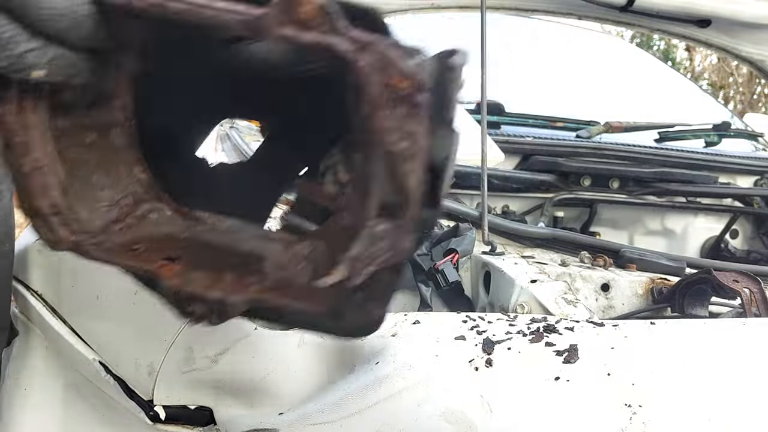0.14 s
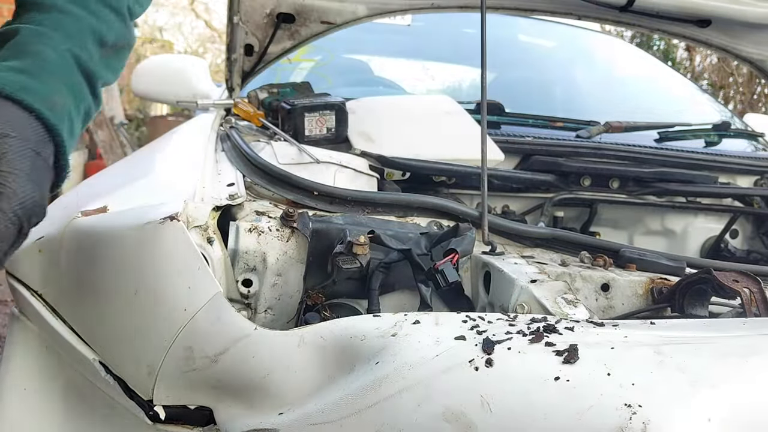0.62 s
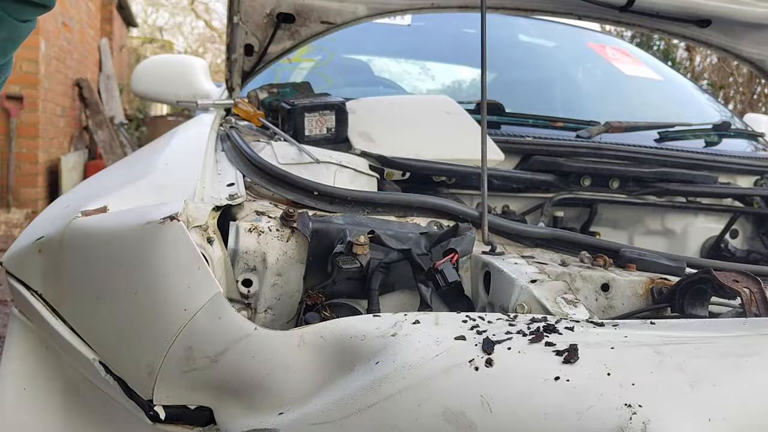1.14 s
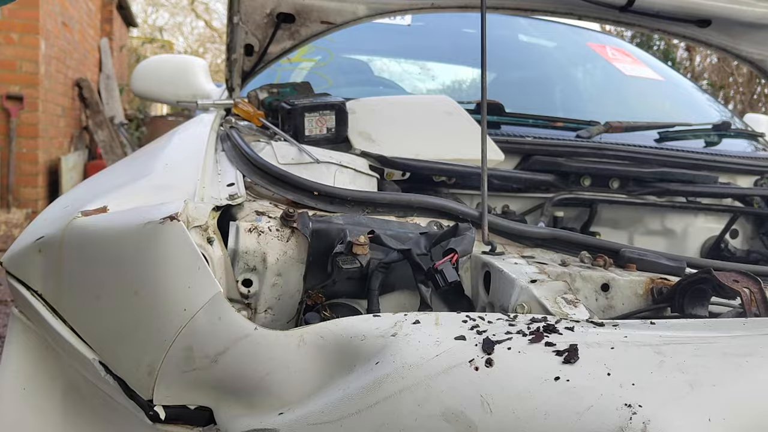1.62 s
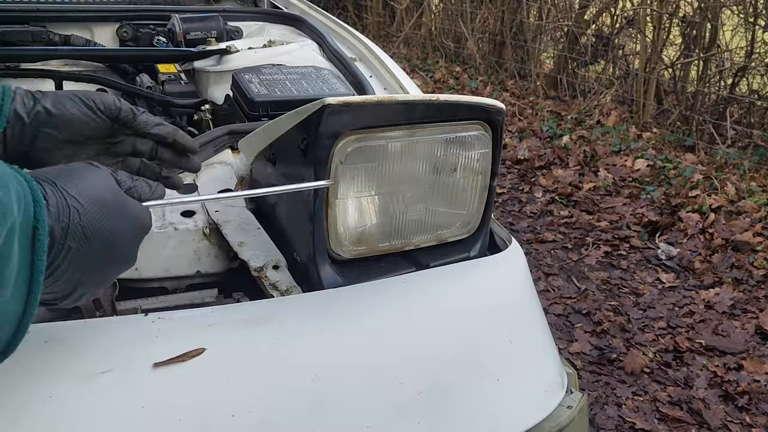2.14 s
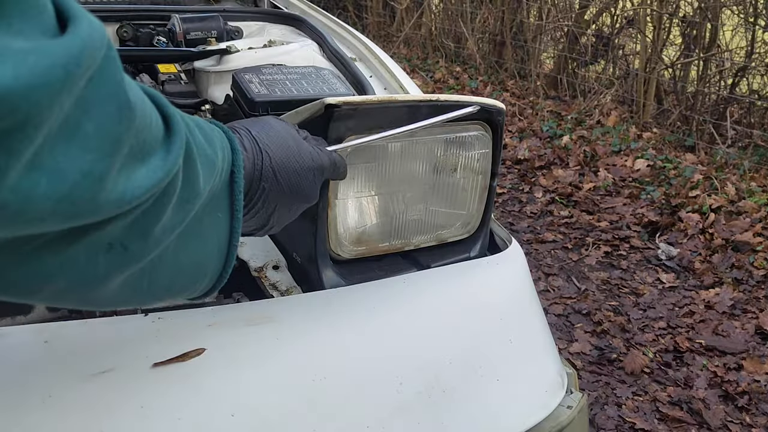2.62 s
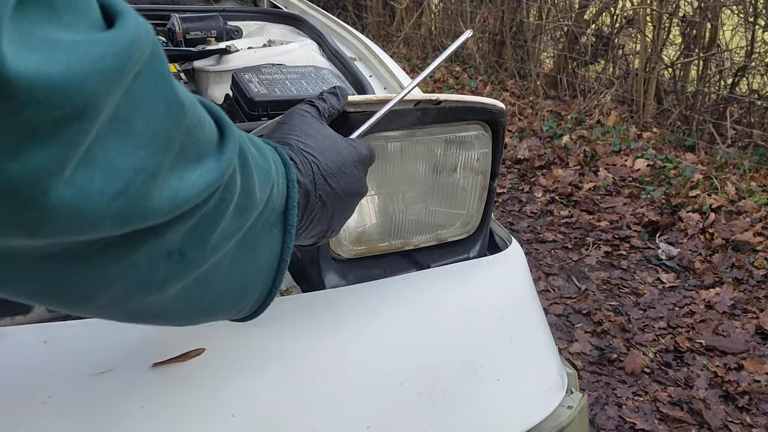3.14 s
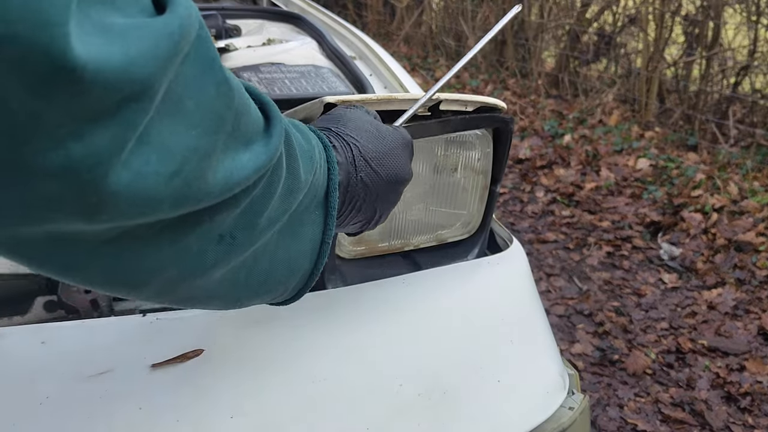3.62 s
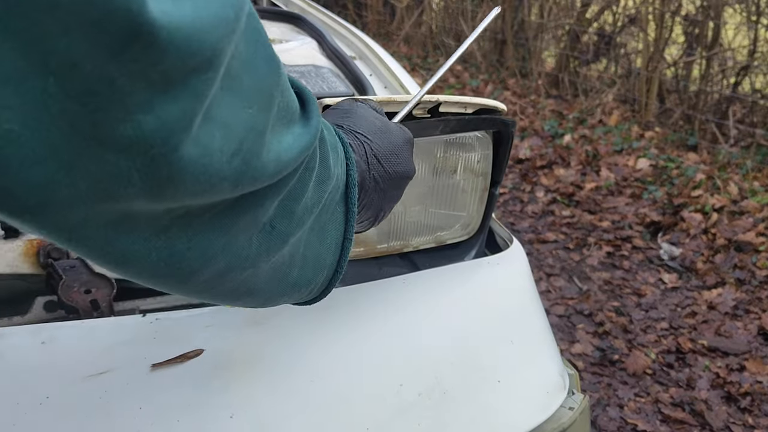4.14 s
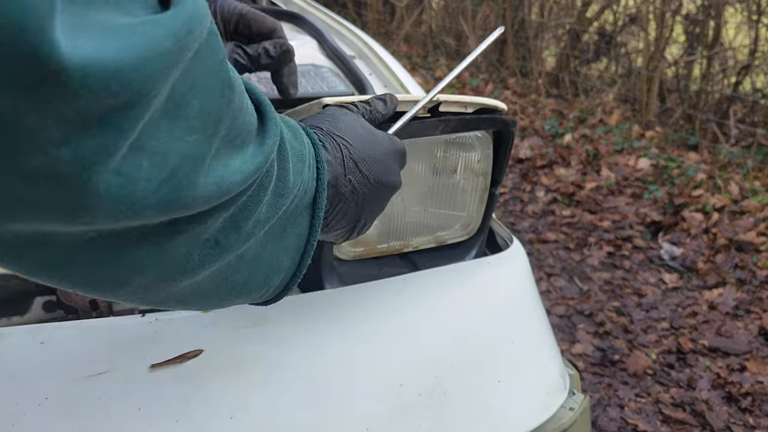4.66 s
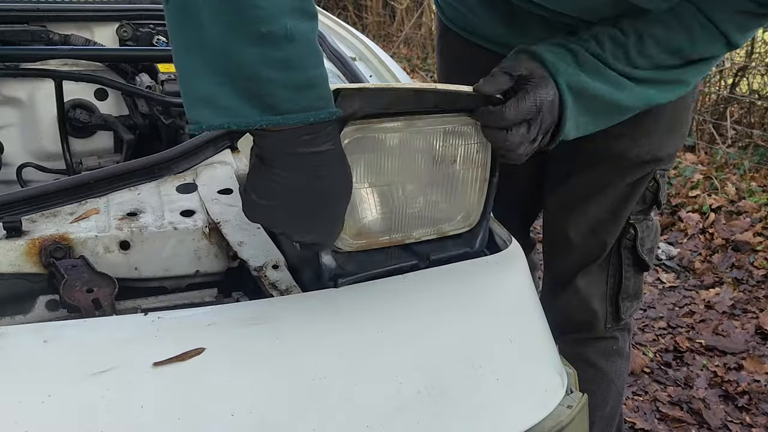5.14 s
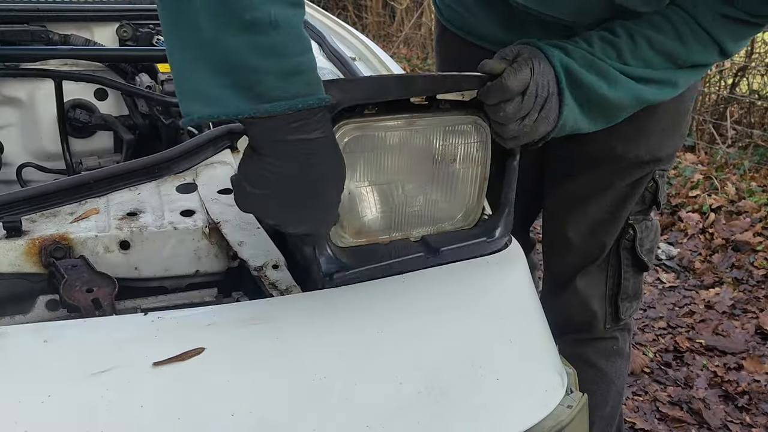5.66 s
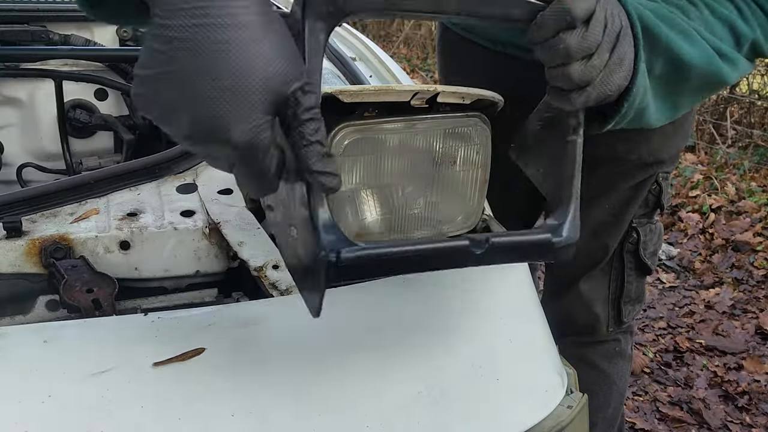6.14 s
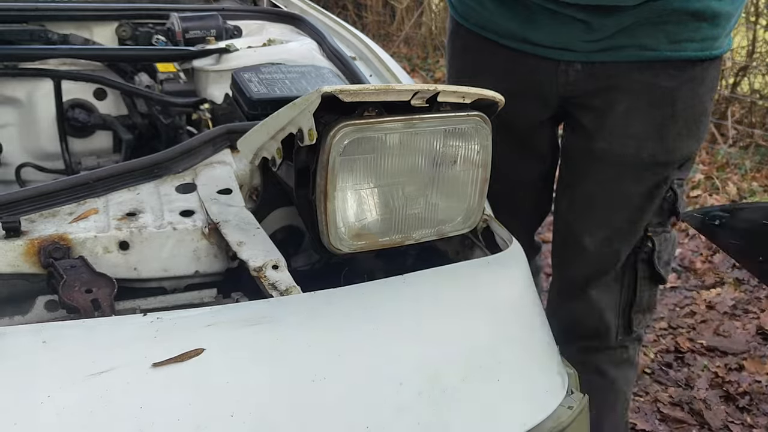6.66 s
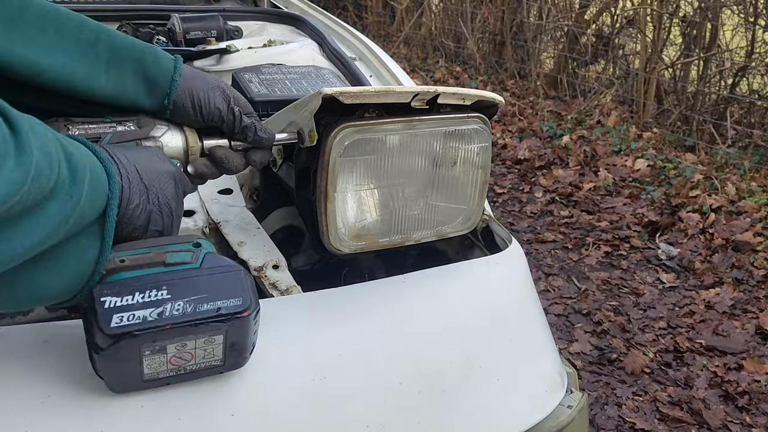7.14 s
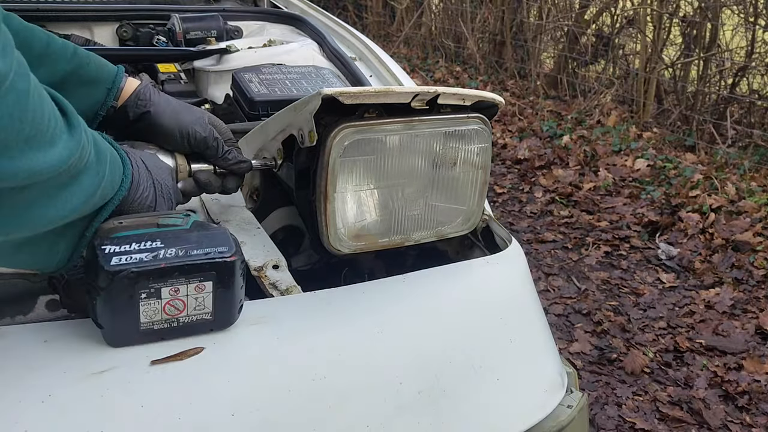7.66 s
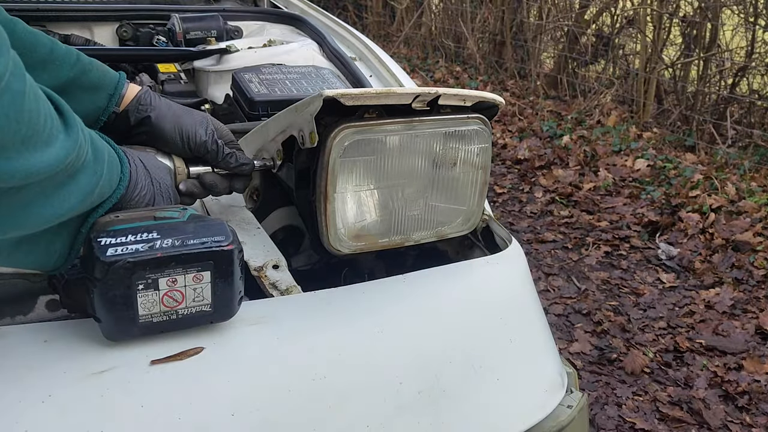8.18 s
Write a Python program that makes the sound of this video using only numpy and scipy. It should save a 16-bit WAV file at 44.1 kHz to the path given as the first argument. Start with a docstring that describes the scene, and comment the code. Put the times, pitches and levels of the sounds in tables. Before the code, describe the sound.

Outdoors by a car, a metal housing drops with a clank, plastic trim is pried and snapped loose, then an impact driver hammers and spins briefly.

```python
"""Outdoors, close to a car's front end: a rusty lamp housing is dropped, a screwdriver pries at a plastic lamp bezel,
the bezel is pulled off, an impact driver hammers a bolt and later spins freely.
Blows are noise cracks with decaying modes, rubbing is stick-slip noise through resonances, the driver is
coloured grit with mesh tones. Birds whistle in gliding sines over filtered-noise traffic and leaves.
The background level and the direction of near sounds step from one stretch of time to the next."""
import sys
import numpy as np
from scipy import signal
from scipy.fft import rfft, irfft, next_fast_len
from scipy.io import wavfile
from scipy.ndimage import uniform_filter1d, map_coordinates

SR = 44100
rng = np.random.default_rng(int(sys.argv[2]) if len(sys.argv) > 2 else 0)


def boost_factor(decibels):
    """Convert a level in decibels to a linear amplitude factor."""
    exponent = np.asarray(decibels, float) / 20
    return 10 ** exponent


def put_to_file(sound):
    """Save the sound as 16-bit audio at rate SR, in the file named by the first command-line argument."""
    columns = np.atleast_2d(sound).T  # one column per channel
    safe = np.clip(columns, -1, 1)
    whole_steps = np.round(safe * 32767)
    wavfile.write(sys.argv[1], SR, whole_steps.astype(np.int16))


N = 365575
TIME = np.arange(N) / SR
HZ = np.maximum(np.fft.rfftfreq(next_fast_len(N), 1 / SR), 1)
FADE_DB = 30  # the fall that rise, fall, unloading and run-down times span
CRACK_T60_S = 0.016  # of the main part of a crack

# Modes of the car panel. Each row: frequency in Hz, level in dB, t60 in seconds.
PANEL_MODES = [(103, -20, 0.029), (146, -8.5, 0.12), (166.3, -6, 0.12), (210, 2.5, 0.078), (253.7, -5, 0.1),
               (280, 3, 0.052), (341.6, -6.5, .1), (364, -6, 0.075)]
# Modes of the plastic bezel. Each row: frequency in Hz, level in dB, t60 in seconds.
BEZEL_MODES = [(458, 8.5, 0.057), (501, 5.5, 0.091), (575, 3.5, 0.062), (647, 2, 0.09), (705, 3, .06),
               (929, 2, 0.066), (968, 6.5, 0.012), (1260, -0.5, 0.062), (1484, -4.5, 0.037),
               (1800, -9.5, 0.029)]
# Modes of the bolt. Each row: frequency in Hz, level in dB, t60 in seconds.
BOLT_MODES = [(709, -7.5, 0.17), (927, -2, 0.26), (1644, -5.5, 0.16), (2610, -0.5, 0.07),
              (2775, -5.5, 0.058), (3033, -4, 0.06), (3210, 0, 0.061), (3285, -13.5, 0.24),
              (3335, -13.5, 0.23), (3920, -5.5, 0.034), (4587, -7, 0.065), (4850, -6.5, 0.046)]
# Bright snaps of catches and bit that also jolt the panel.
# Each row: start in seconds, crack level in dB, thud level in dB, crack frequency in Hz, thud focus in Hz.
SNAPS = [(4.046, -40, -39.5, 3870, 372), (5.414, -24.5, -31.5, 5640, 215), (5.4224, -13, -26, 4800, 290),
         (5.455, -26, -45, 4630, 256), (5.7656, -29.5, -35, 4500, 254), (5.784, -15.5, -34, 4460, 210),
         (5.7171, -27, -49, 4400, 250), (5.8158, -22, -32.5, 4450, 215), (5.8475, -27, -43.5, 4280, 250),
         (6.0114, -24, -29, 4320, 357), (6.0705, -19.5, -36, 3200, 364), (7.742, -39.5, -25.5, 3480, 136),
         (7.872, -17.5, -35.5, 5700, 303), (7.878, -12, -36.5, 6460, 400), (7.889, -18.5, -31.5, 6050, 380),
         (7.896, -20.5, -35, 5510, 400)]
# Rustling cloth and leaves. Each row: peak time, rise and fall in seconds, level in dB.
RUSTLES = [(0.03, 0.33, 0.14, -71), (0.39, 0.46, 0.16, -67), (0.44, 0.0081, 0.28, -64),
           (0.53, 0.19, 0.017, -57.5), (1.33, 0.13, 0.12, -58.5), (1.6, 0.13, 0.071, -73.5),
           (2.85, 1, 0.47, -78), (5.1, 0.18, 0.056, -70), (1.45, 0.092, .5, -72.5),
           (7.36, 0.046, 0.25, -71), (7.0, 0.12, 0.45, -69.5), (7.08, 0.27, 0.29, -73.5)]


def unit(x):
    """Normalisation of signal power: scale to rms 1."""
    return x / np.sqrt(np.mean(x ** 2))


def over_hz(points):
    """Interpolation of (Hz, value) points on a logarithmic frequency axis."""
    hz, value = np.transpose(points)
    return np.interp(np.log(HZ), np.log(hz), value)


def shaped(x, gain):
    """Linear filtering as a product in the frequency domain, one gain per frequency."""
    size = next_fast_len(N)
    return irfft(rfft(x, size) * gain, size)[..., :N]


def tinted(x, points):
    """Spectral colouring by a response given as (Hz, dB) points."""
    return shaped(x, boost_factor(over_hz(points)))


def walk(rate):
    """Slow random modulation: levels held 1 / rate seconds and slewed twice, spread near 1."""
    k = int(SR / rate)
    held = np.repeat(rng.standard_normal(N // k + 1), k)
    return 1.3 * uniform_filter1d(uniform_filter1d(held, k), k)[:N]


def swells(rows):
    """Exponential growth and decay: one gain curve a row, straight in dB up to the peak and down from it."""
    for peak_s, rise_s, fall_s, db, *rest in rows:
        corners = [peak_s - 3 * rise_s, peak_s, peak_s + 3 * fall_s]
        yield boost_factor(db + np.interp(TIME, corners, [-3 * FADE_DB, 0, -3 * FADE_DB])), rest


def add(out, s, sound):
    """Superposition: mix a sound in at s seconds."""
    i = int(s * SR)
    out[i:i + len(sound)] += sound[:N - i]


def ring(modes, scatter_db, t, rise=0.00032, focus_hz=None, detune=0.018):
    """Modal response to one blow: its spot sets each mode's share, a soft push rises slowly. Peak 1."""
    hz, db, t60 = np.transpose(modes)[:, :, None]
    chance = rng.standard_normal((2, len(modes), 1))
    if focus_hz:
        db = db - 25 * np.log2(hz / focus_hz) ** 2
    tones = np.sin(2 * np.pi * hz * (1 + detune * chance[1]) * t)
    y = np.sum(boost_factor(db + scatter_db * chance[0]) * tones * boost_factor(-60 * t / t60), axis=0)
    y = y * (1 - np.exp(-t / rise)) ** 2
    return y / np.abs(y).max()


def crack(hz, t60, t, q, broad_db):
    """Impulsive contact: a tick and a noise burst around one frequency, duller when that is low. Peak 1."""
    decay = boost_factor(-60 * t / t60) + .1 * boost_factor(-15 * t / t60)  # a weak tail lasts longer
    burst = rng.standard_normal(len(t)) * decay
    burst[0] = 4
    band = signal.butter(1, [1200, min(2.0 * hz, 15000)], "band", fs=SR, output="sos")
    base = signal.sosfilt(band, burst)
    y = boost_factor(broad_db) * base + signal.lfilter(*signal.iirpeak(hz, q, fs=SR), base)
    return y / np.abs(y).max()


def grit(rate, spread_db, fine):
    """Stick-slip friction: random slips of uneven size, rate per second, over fine noise."""
    slips = (rng.random(N) < rate / SR) * boost_factor(spread_db * rng.standard_normal(N)) * rng.standard_normal(N)
    return unit(unit(slips) + fine * rng.standard_normal(N))


def resonated(x, hz, q):
    """Forced resonance: a single peak filter driven by x."""
    return signal.lfilter(*signal.iirpeak(hz, q, fs=SR), x)


def blow(out, s, crack_db, crack_hz, ring_db, part, detune=0.018):
    """Impact excitation: the contact cracks and the struck part rings in its modes."""
    t = TIME[:SR // 3]
    add(out, s, boost_factor(crack_db) * crack(crack_hz, CRACK_T60_S, t, q=2.8, broad_db=-7))
    add(out, s, boost_factor(ring_db) * ring(part, 2.8, t, rise=0.00045, detune=detune))


def thud(out, s, db, focus_hz):
    """Structural coupling: a blow passes on to the panel beneath, and the whole wing gives."""
    t = TIME[:SR // 3]
    # Wing modes. Each row: frequency in Hz, level in dB, t60 in seconds.
    wing_modes = [(106, -2, 0.02), (127.5, -1.5, 0.091), (151.4, 2, 0.064)]
    add(out, s, boost_factor(db) * ring(PANEL_MODES, 2.5, t, rise=0.0015, focus_hz=focus_hz))
    add(out, s, boost_factor(db - 8) * ring(wing_modes, 1.9, t, rise=0.001))


def dropped_housing():
    """Repeated impact of a falling body: the housing lands, bounces and rings in its own modes."""
    out = np.zeros(N)
    # Modes of the housing. Each row: frequency in Hz, level in dB, t60 in seconds.
    housing_modes = [(221, -40, 3.8), (330, -2.5, .1), (407, 8, 0.16), (530, 5, 0.11), (663.3, -9.5, 0.54),
                     (686, -15, .4), (622, 7.5, 0.08), (712, 4, 0.17), (846, -0.5, 0.11), (1249, -4, 0.13),
                     (1010, -4, 0.065), (1656, -4.5, 0.065), (1965, -9.5, 0.084), (2350, -13, 0.057),
                     (3085, -15, .05), (4190, -24.5, .3), (4360, -24.5, 0.3)]
    # Each row: start in seconds, crack, ring and thud levels in dB, crack frequency in Hz.
    bounces = [(1.255, -44, -65, -68, 4270), (1.282, -21.5, -15.5, -55, 1870),
               (1.289, -42, -26.5, -41.5, 2120), (1.2982, -43, -30, -35, 4400),
               (1.315, -44, -36.5, -54, 4020), (1.3264, -40, -37, -51, 3780),
               (1.344, -33, -38, -60.5, 3540), (1.4182, -43.5, -53, -57, 3200),
               (1.598, -34.5, -45.5, -50, 2150), (1.6616, -58, -55, -52, 3700)]
    for s, crack_db, ring_db, thud_db, crack_hz in bounces:
        blow(out, s, crack_db, crack_hz, ring_db, housing_modes, detune=.004)
        thud(out, s, thud_db, focus_hz=330)
    return out


def bezel_knocks():
    """Soft impact: tool and hand knock dully on the bezel, with most weight in the low modes beneath."""
    out = np.zeros(N)
    # Each row: start in seconds, crack, ring and thud levels in dB, thud focus in Hz.
    knocks = [(1.821, -59, -54.5, -40, 246), (1.8801, -36.5, -49.5, -35, 260),
              (1.9045, -53, -59, -36.5, 248), (1.927, -65, -59, -35, 240), (1.953, -65, -68, -38, 250),
              (2.6726, -36.5, -67, -24, 210), (2.8766, -49, -50.5, -53, 107), (3.303, -57, -56, -52, 323),
              (3.466, -65, -53, -35, 267), (3.476, -32, -34.5, -31.5, 330), (3.7847, -51.5, -45, -30, 268),
              (3.8066, -35.5, -28, -26.5, 127.7), (3.8291, -28, -24, -12, 279),
              (4.0557, -48, -35.5, -32.5, 333), (5.392, -34.5, -28, -37, 280), (5.4026, -23, -20, -32, 229),
              (5.434, -41.5, -22.5, -38, 249), (5.678, -60, -59, -46.5, 130),
              (5.7467, -38.5, -41, -26, 207), (5.9544, -33, -37, -29, 221),
              (5.9864, -40.5, -32, -17.5, 213.7), (5.9921, -25.5, -24.5, -31.5, 300),
              (6.04, -32.5, -36, -28.5, 219), (7.83, -28, -26, -29.5, 325)]
    for s, crack_db, ring_db, thud_db, thud_hz in knocks:
        blow(out, s, crack_db, 1420, ring_db, BEZEL_MODES)
        thud(out, s, thud_db, thud_hz)
    return out


def snaps():
    """Sudden release of strain: catches and bit snap brightly, ring the bezel and jolt the panel."""
    out = np.zeros(N)
    # Modes of a snapping catch. Each row: frequency in Hz, level in dB, t60 in seconds.
    catch_modes = [(2327, -1.5, 0.022), (4344, -0.5, 0.017), (4700, -3.5, 0.015), (6880, -3.5, 0.035)]
    for s, crack_db, thud_db, crack_hz, thud_hz in SNAPS:
        ring_db = crack_db + 0.61 * (thud_db - crack_db) - 8  # the ring follows both crack and thud
        blow(out, s, crack_db, crack_hz, ring_db, BEZEL_MODES)
        thud(out, s, thud_db, thud_hz)
        add(out, s, boost_factor(crack_db - 5) * ring(catch_modes, 1.4, TIME[:SR // 3], rise=0.00018, detune=.04))
    return out


def clicks():
    """Very short clicks without a thud, faint to loud, over a weak ring; most are impulsive contacts of the
    work. One, at 1.72 s, sounds just where the background steps."""
    out = np.zeros(N)
    # Each row: start in seconds, crack level in dB, crack frequency in Hz.
    short_clicks = [(0.0917, -47.5, 2800), (0.474, -36, 3700), (0.499, -36, 3450), (1.7191, -45.5, 5140),
                    (2.3288, -47, 7000), (2.4928, -60, 1980), (3.123, -51, 3910), (3.437, -59, 2170),
                    (3.451, -53, 2230), (3.463, -47, 1900), (4.421, -50.5, 2050), (4.589, -60, 1690),
                    (5.106, -39, 3600), (5.3682, -42, 2290), (5.4455, -27, 4000), (5.483, -16.5, 4700),
                    (5.872, -35.5, 4994), (6.032, -29, 4430), (6.0766, -17, 4970), (6.0925, -23.5, 5130),
                    (6.111, -39, 3000), (6.1261, -22.5, 4440), (6.373, -72, 1573), (7.646, -23, 3270)]
    for s, db, hz in short_clicks:
        blow(out, s, db, hz, db - 18, BEZEL_MODES)
    return out


def rubs(stretch):
    """Stick-slip friction: slips hiss and drive part and panel; a heavier push is deeper and less fizzy."""
    # Rubbing and rattling contact. Each row: peak time, rise and fall in seconds, scrape level in dB,
    # weight of the push in dB (panel over scrape).
    contacts = [(0.212, 0.043, 0.055, -54, -15.5), (1.284, 0.017, 0.15, -48.5, 8),
                (1.345, 0.11, 0.17, -58.5, -9.5), (1.882, 0.025, 0.013, -55, 6),
                (2.69, 0.031, 0.051, -46.5, 11), (2.872, 0.14, 0.14, -70, 14),
                (3.304, 0.068, 0.16, -68.5, 16), (3.476, 0.036, 0.073, -58.5, 19),
                (3.81, 0.026, 0.083, -47.5, 9.5), (3.856, 0.058, 0.0093, -58, 25.5),
                (4.054, 0.0094, 0.051, -45.5, 1), (4.424, 0.041, 0.037, -60.5, -3.5),
                (4.604, .1, 0.012, -85, -11), (5.384, 0.003, 0.14, -48.5, 3),
                (5.404, 0.031, 0.13, -38.5, 8), (5.45, 0.064, 0.055, -47, 7.5),
                (5.487, 0.0074, 0.014, -51, 1.5), (5.724, .06, 0.19, -62.5, 2), (5.79, 0.12, 0.14, -55, 8),
                (5.954, 0.0062, 0.31, -46.5, 5), (6.008, 0.066, 0.11, -44.5, 6),
                (6.074, 0.017, 0.041, -34.5, -8.5), (7.646, 0.0021, 0.053, -36.5, -9.5),
                (7.745, 0.054, 0.12, -64, 22.5), (7.83, 0.014, 0.4, -52.5, 13),
                (7.89, .07, 0.13, -35.5, -7)]
    # Colour of the scrape. Each row: frequency in Hz, level in dB per Hz.
    scrape_colour = [(900, -21), (1400, 4), (2300, 3), (3400, -1.5), (5000, -22.5)]
    # Colour of the fizz. Each row: frequency in Hz, level in dB per Hz.
    fizz_colour = [(3000, -7), (4300, 8.5), (5400, 0), (7500, -1), (11000, -21), (16000, -19)]
    # Resonances of thin walls that colour the hiss, in Hz.
    wall_hz = [1220, 1510, 1910, 2320, 2620, 3200, 3980, 4500, 5540, 6300, 7300]
    # The part rings more or less in each stretch: ring over scrape in dB, one value a stretch.
    stretch_ring_db = [-6.5, 10, -2, 0, -2.5, -1.5]
    # Fizz over scrape in dB, one value a stretch.
    stretch_fizz_db = [-11.5, -16, -8, -4, -4.5, -9]
    mode_sway_db = 3.5  # as the contact slides along, each mode swells and fades on its own

    slips = grit(900, 2.7, .9) * boost_factor(2.0 * walk(60))
    panel = unit(signal.fftconvolve(slips, ring(PANEL_MODES, 0, TIME[:SR // 4]))[:N])
    part = np.zeros(N)
    for hz, db, t60 in BEZEL_MODES:
        sway = boost_factor(db + mode_sway_db * walk(45))
        part += sway * resonated(slips, hz, hz * t60 / 2.0) * t60 ** .5
    part = unit(part)
    walls = sum(boost_factor(mode_sway_db * walk(70)) * resonated(slips, hz, 8.0) for hz in wall_hz)
    hiss = unit(walls) + .4 * slips
    scrape = unit(tinted(hiss, scrape_colour))
    fizz = unit(tinted(hiss, fizz_colour))

    ring_db = np.array(stretch_ring_db)[stretch]
    fizz_db = np.array(stretch_fizz_db)[stretch]
    out = boost_factor(-6.5) * fizz * sum(gain for gain, _ in swells(RUSTLES))  # rustles fizz too
    for gain, (push_db,) in swells(contacts):
        part_gain = boost_factor(ring_db + 0.33 * push_db)
        fizz_gain = boost_factor(fizz_db - 0.16 * push_db)
        out = out + gain * (scrape + part_gain * part + boost_factor(push_db) * panel + fizz_gain * fizz)
    return out


def bracket():
    """Lightly damped modes: a thin steel bracket is left ringing faintly by some of the blows."""
    out = np.zeros(N)
    # Each row: start in seconds, level in dB.
    bracket_hits = [(4.06, -66), (5.366, -61), (5.483, -61)]
    # Each row: frequency in Hz, level in dB, t60 in seconds.
    bracket_modes = [(2270, 3, 0.41), (2850, 2, .2)]
    for s, db in bracket_hits:
        add(out, s, boost_factor(db) * ring(bracket_modes, 2.5, TIME[:SR // 2], detune=.003))
    return out


def driver_blows():
    """Impact with stored energy: a cam lets go, the hammer cracks and rings bolt and bezel."""
    out, t = np.zeros(N), TIME[:SR // 2]
    # Each row: start in seconds, level in dB.
    hammer_blows = [(7.1211, -16.5), (7.1453, -11.5), (7.1695, -12), (7.196, -17.5), (7.2202, -16.5),
                    (7.2388, -18.5)]
    # Modes of the tool's case. Each row: frequency in Hz, level in dB, t60 in seconds.
    case_modes = [(330, 2, 0.037), (416, -3, 0.038)]
    for s, db in hammer_blows:
        strike = crack(4500, 0.022, t, q=0.55, broad_db=1.5)
        strike += boost_factor(-25.5) * ring(BEZEL_MODES, 4.1, t)
        strike += boost_factor(-15.5) * ring(BOLT_MODES, 2.8, t, focus_hz=2880)
        add(out, s, boost_factor(db) * strike)
        if s > hammer_blows[0][0]:
            # the cam clicks just before each blow after the first, and the case thumps with it
            release = crack(2800, CRACK_T60_S, t, q=1.2, broad_db=9.0)
            release += boost_factor(-8.5) * ring(case_modes, 3.2, t, rise=0.00092)
            add(out, s - 0.0055, boost_factor(db - 7.5) * release)
    return out


def braked_bolt():
    """Free modal decay: the bolt rings, struck as the driver brakes."""
    out = np.zeros(N)
    add(out, 7.315, boost_factor(-34) * ring(BOLT_MODES, 0, TIME[:SR // 2], detune=0.0021))
    return out


def driver_motor():
    """Gear-mesh noise: teeth grind under load; the free spin is differently coloured, with wavering mesh tones."""
    # Colour of the loaded gears. Each row: frequency in Hz, level in dB per Hz.
    gear_colour = [(120, -37), (200, -5), (380, -0.5), (821, -6.5), (916, -14.5), (1140, -7), (3190, -7),
                   (7410, -11.5), (8270, -19), (11900, -19), (16000, -27.5)]
    # Colour of the unloaded motor and fan. Each row: frequency in Hz, level in dB per Hz.
    spin_colour = [(88, -38), (150, -17), (258, -15.5), (388, -3), (540, -10.5), (681, -12.5),
                   (1400, -10.5), (3280, -9), (5000, -19.5), (7410, -22.5), (8000, -25.5), (8660, -37),
                   (11100, -32.5), (15500, -46.5)]
    # Mesh tones. Each row: frequency in Hz, relative level in dB.
    mesh_tones = [(393.0, -63.5), (1012, -78), (1615, -72), (2019, -69.5), (2374, -74), (3241, -69),
                  (3763, -75), (5701, -78.5), (6955, -83), (7892, -87), (8145, -89.5)]
    # Gears grind to a stop. Each row: peak time, rise and fall in seconds, level in dB.
    brakings = [(7.318, 0.15, 0.027, -42)]
    # Each row: trigger, end of load and release in seconds, loaded and free levels in dB.
    runs = [(7.119, 7.235, 7.33, -48.5, -44.5), (7.864, 7.91, 8.4, -28, -45)]
    spin_up_s, unload_s, run_down_s = 0.0032, 0.021, 0.11

    teeth = grit(2500, 0.95, 1.2)
    gears = unit(tinted(teeth, gear_colour))
    spin = unit(tinted(teeth, spin_colour))
    waver = np.cumsum(1 + 0.0016 * walk(25)) / SR  # time base of an unsteady speed
    mesh = unit(sum(boost_factor(db + 2.9 * walk(26)) * np.sin(2 * np.pi * hz * waver) for hz, db in mesh_tones))
    out = gears * sum(gain for gain, _ in swells(brakings))
    for on, unload, off, loaded_db, free_db in runs:
        spin_up = np.clip((TIME - on) / spin_up_s, 0, 1)
        turning = spin_up * boost_factor(-FADE_DB * np.maximum(TIME - off, 0) / run_down_s)
        load = boost_factor(loaded_db - FADE_DB * np.maximum(TIME - unload, 0) / unload_s + 2.2 * walk(40))
        sag_db = -20 * (TIME - unload) * (TIME > on)  # 20 dB a second, through 0 where the load ends
        free = boost_factor(free_db + sag_db + 0.94 * walk(23))
        out = out + turning * (load * gears + free * (spin + boost_factor(-9.0) * mesh))
    return out


def echoes(x, t60):
    """Diffuse reflection: hedge, wall and car body send back a noisy tail, duller than the direct sound."""
    t = TIME[:SR // 3]
    noise = signal.lfilter(*signal.butter(1, 7000, fs=SR), rng.standard_normal(len(t)))
    tail = noise * boost_factor(-60 * t / t60)
    return signal.oaconvolve(x, tail / np.sqrt(np.sum(tail ** 2)))[:N]


def bird(notes, trill_hz, rough, trill_depth, far_db):
    """Frequency and amplitude modulation: gliding, wandering whistles with a trill; trees draw them out."""
    call = np.zeros(N)
    wander = 1 + rough * walk(570)
    flutter = boost_factor(1.7 * walk(120))
    for s, length, first_hz, last_hz, db in notes:
        t = TIME[:int(length * SR)]
        pitch = np.linspace(first_hz, last_hz, len(t)) * wander[int(s * SR):][:len(t)]
        edges = np.clip(np.minimum(t, length - t) / 0.0027, 0, 1)
        add(call, s, boost_factor(db) * edges * np.sin(2 * np.pi * np.cumsum(pitch) / SR))
    call = call * flutter * (1 + trill_depth * np.sin(2 * np.pi * trill_hz * TIME))
    return call + boost_factor(far_db) * echoes(call, 0.6)


def birds():
    """Direct against scattered sound: two near singers with rough trills and one clear far whistle."""
    # In all three, each row: start and length in seconds, first and last frequency in Hz, level in dB.
    high_notes = [(.758, 0.075, 8240, 8290, -57), (.83, 0.038, 8100, 7130, -55.5),
                  (.865, 0.026, 7450, 7450, -65), (.945, 0.13, 8620, 8140, -53.5),
                  (1.01, 0.073, 7930, 8000, -65.5), (1.07, 0.2, 8800, 9350, -59)]
    low_notes = [(0.0, 0.13, 2850, 2850, -67.5), (0.1, 0.079, 2920, 3160, -70),
                 (1.47, 0.105, 3500, 3390, -55.5), (1.575, .14, 3610, 3640, -57.5)]
    far_notes = [(4.245, .03, 3150, 3150, -84), (4.275, .04, 2850, 2900, -84),
                 (4.32, .033, 2300, 3150, -83), (4.35, .043, 3150, 3250, -82),
                 (4.39, .065, 3150, 3200, -83), (4.47, .03, 3100, 2300, -82)]
    high = bird(high_notes, 140, 0.0081, 0.33, -5.5)
    low = bird(low_notes, 90, 0.022, 0.7, -30)
    far = bird(far_notes, 49.0, .004, 0.3, -19)
    return high + low + far


def outside(stretch):
    """Ambient noise field: traffic rumble alike on both sides, under wide far hiss and stirring leaves."""
    # Background in each stretch of time. Each row: rumble, far hiss and leaves levels in dB.
    stretch_levels = [(-57.5, -69.5, -104.5), (-58, -75.5, -81.5), (-54, -72, -87), (-60.5, -75.5, -89),
                      (-57.5, -69, -87), (-53.5, -67.5, -72)]
    # The background dips briefly. Each row: deepest time, fall into and climb out of it in seconds, change in dB.
    lulls = [(0.802, 1, 0.19, -1), (7.58, 0.21, 0.115, -16.5)]
    # Low surges as the work is handled. Each row: peak time, rise and fall in seconds, level in dB.
    surges = [(0.36, .5, 0.69, -56), (0.53, .5, 0.23, -53), (4.8, 2.1, 2, -56), (5.45, .3, 0.45, -52),
              (5.77, .3, .5, -50), (6.1, .6, .4, -53.5), (7.9, .5, 0.88, -49.5)]
    # Colours of rumble, far hiss and leaves. Each row: frequency in Hz, level in dB per Hz.
    rumble_colour = [(11, -26.5), (18, -1), (54, 0.5), (70, 3), (80, -6.5), (92, -7.5), (138, -8.5),
                     (300, -36), (390, -56), (660, -120)]
    hiss_colour = [(120, -26.5), (200, -5), (340, -18), (673, -16.5), (1090, -22.5), (1290, -25),
                   (2200, -36), (2860, -71.5), (4840, -120)]
    leaf_colour = [(940, -15.5), (1600, -10), (2990, -7), (3390, -5), (6470, -9.5), (8890, -8.5),
                   (16000, -22.5)]

    lull_db = sum(np.interp(TIME, [s - into, s, s + out], [0, db, 0]) for s, into, out, db in lulls)
    rumble, hiss, leaves = boost_factor(np.array(stretch_levels)[stretch].T + lull_db)
    rumble = np.hypot(rumble, sum(gain for gain, _ in swells(surges)))  # powers add
    leaves = np.hypot(leaves, sum(gain for gain, _ in swells(RUSTLES)))
    mid = unit(tinted(rng.standard_normal(N), rumble_colour)) * rumble * boost_factor(0.69 * walk(4.2))
    side = 0
    for points, gain in ((hiss_colour, hiss), (leaf_colour, leaves)):
        pair = tinted(rng.standard_normal((2, N)), points)
        pair = pair / np.std(pair) * gain * boost_factor(3.1 * walk(32))
        mid, side = mid + pair[0], side + pair[1]
    return mid, side


def scene():
    """Time and level differences place near sources between two ports; scattered sound is diffuse."""
    # Direction of near sounds in each stretch of time.
    # Each row: start in seconds, lead of the left in milliseconds, left minus right in dB.
    directions = [(0, .12, .3), (.55, .43, 1.0), (1.72, .07, .2), (5.12, .04, .2), (7.115, .06, 1.5),
                  (7.63, .15, .3)]
    # Treble of near sounds from about 8 kHz up, in dB, one value a stretch.
    sheen_db = [7, -1, -3.5, 4, 8.5, 5.5]
    since, lead_ms, pan_db = np.transpose(directions)
    stretch = np.searchsorted(since, TIME, side="right") - 1
    near = dropped_housing() + bezel_knocks() + snaps() + clicks() + rubs(stretch) + bracket()
    near = near + driver_blows() + braked_bolt() + driver_motor() + birds()
    treble = shaped(near, np.clip((HZ - 8000) / 1500, 0, 1))
    near = near + (boost_factor(np.array(sheen_db)[stretch]) - 1) * treble

    # hands and parts move about, so the direction wanders
    lead = (lead_ms[stretch] + 0.052 * walk(70)) * SR / 1000
    left, right = (boost_factor(k * pan_db[stretch] / 2) * map_coordinates(near, [np.arange(N) + k * lead / 2], order=3)
                   for k in (1, -1))
    air_mid, air_side = outside(stretch)
    mid = boost_factor(-12.5) * echoes(near, 0.093) + air_mid
    side = boost_factor(-14) * echoes(near, 0.11) + air_side
    return np.array([left + mid + side, right + mid - side])


def roll_off(x):
    """The treble ends steeply here."""
    return signal.sosfilt(signal.butter(12, 16490, fs=SR, output="sos"), x)


def record(dry):
    """Linear colouring and saturation: bass nearly mono, thin treble, rounded peaks and no very top."""
    # What is kept of left minus right. Each row: frequency in Hz, gain in dB.
    width = [(60, -55.5), (110, -54.5), (200, -48), (380, -16), (700, 1.5), (1290, 1.5), (2380, 0),
             (4400, -2), (8120, 0), (15000, -3.5)]
    # Overall treble colour, thin near 8.8 kHz. Each row: frequency in Hz, gain in dB.
    treble_colour = [(20, -1.5), (6500, 1.5), (7800, -1.5), (8800, -20.5), (10500, -10.5), (13000, -4.5),
                     (16000, -11.5)]
    ceiling = .4  # peaks near this size are rounded off
    mid = (dry[0] + dry[1]) / 2
    side = tinted((dry[0] - dry[1]) / 2, width)
    heard = tinted(np.array([mid + side, mid - side]), treble_colour)
    heard = ceiling * np.tanh(heard / ceiling)
    cut = signal.sosfilt(signal.ellip(8, .2, 70, 16000, fs=SR, output="sos"), heard)
    return roll_off(cut)


dry = scene()
out = record(dry)
put_to_file(out)
```